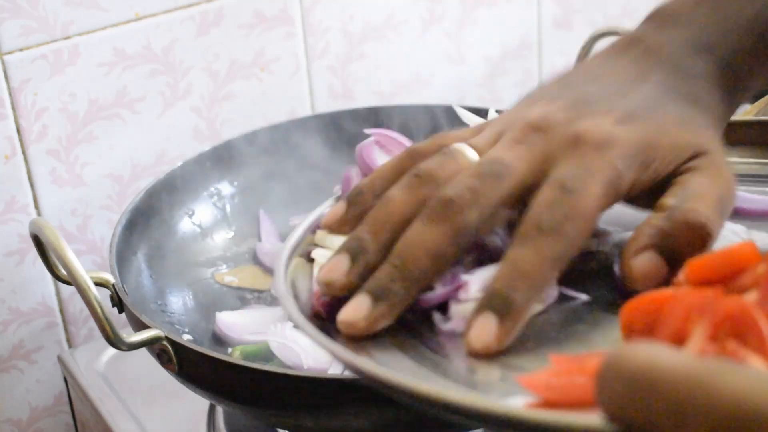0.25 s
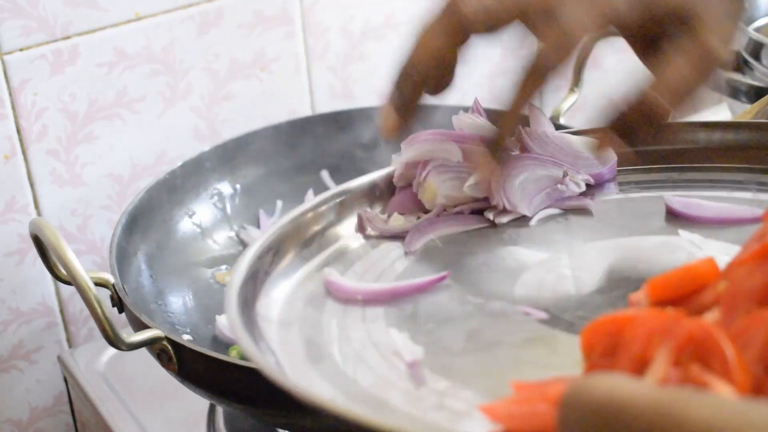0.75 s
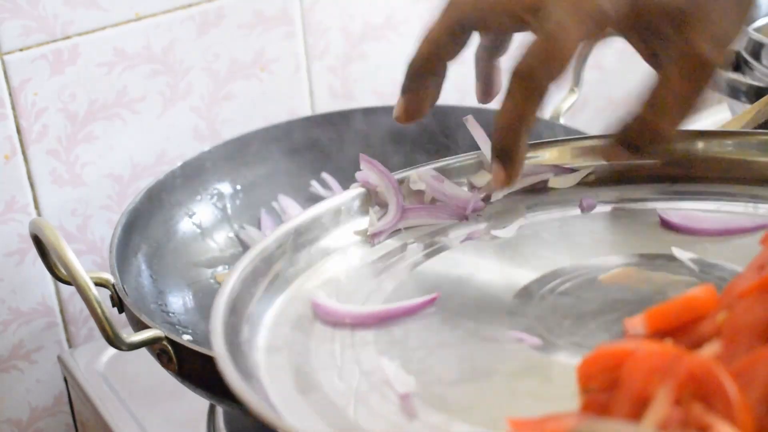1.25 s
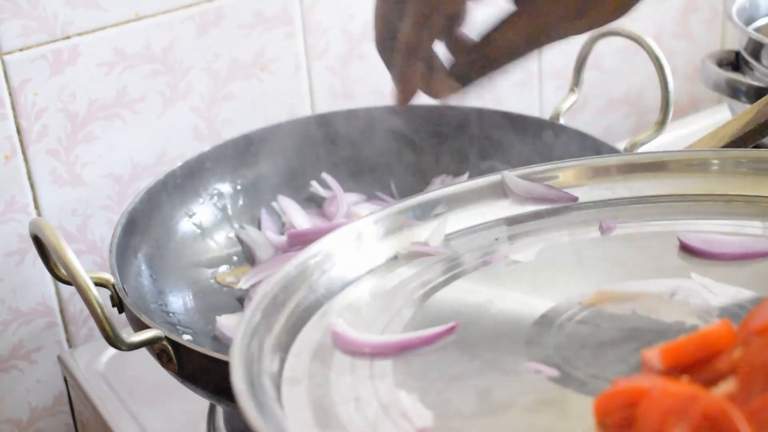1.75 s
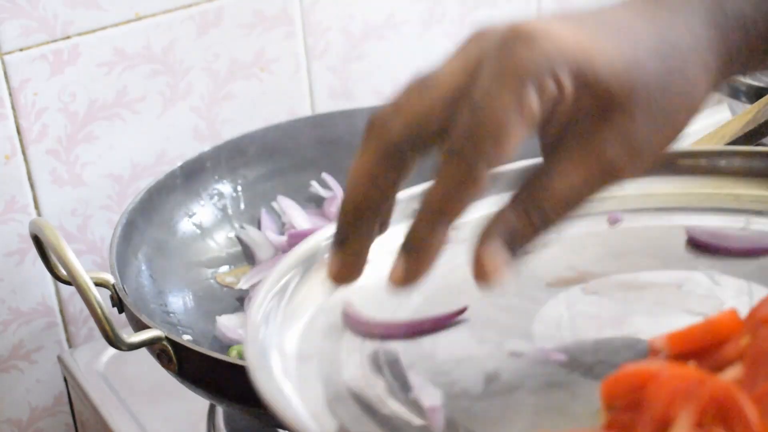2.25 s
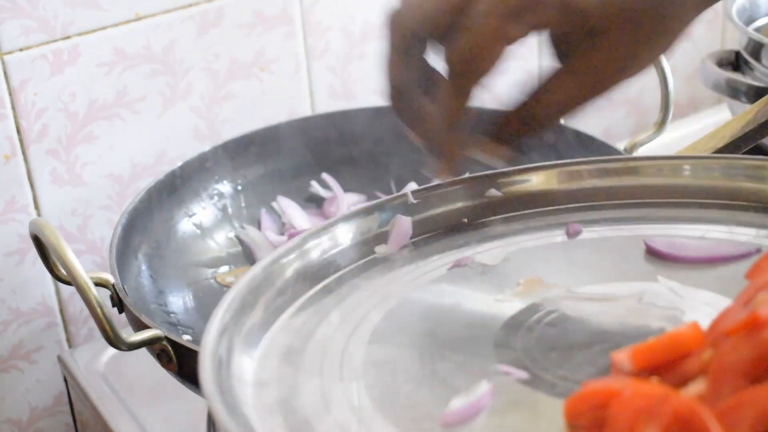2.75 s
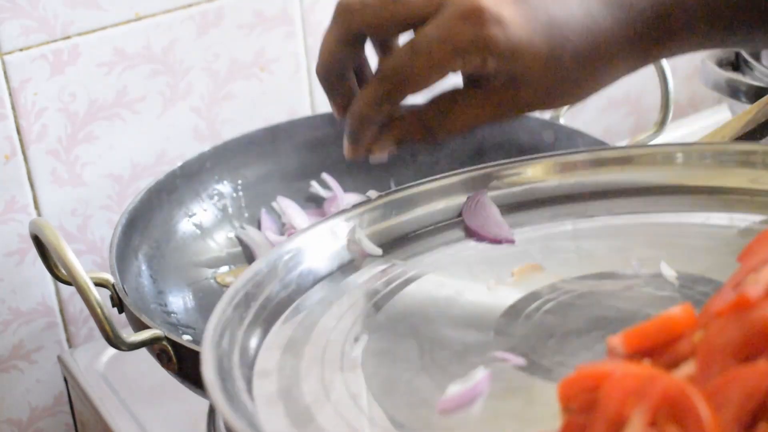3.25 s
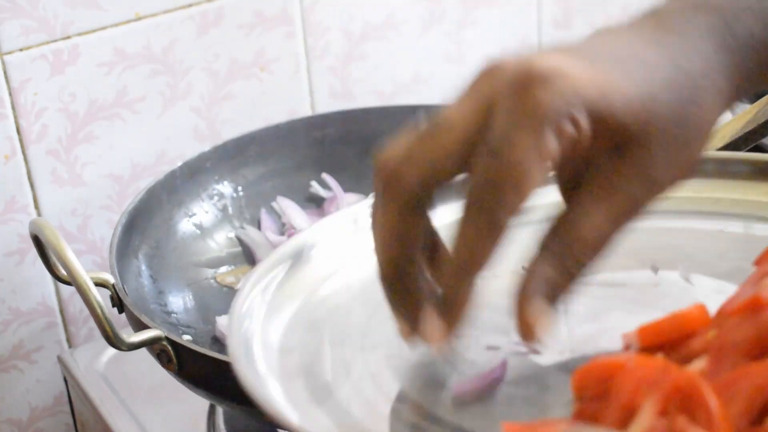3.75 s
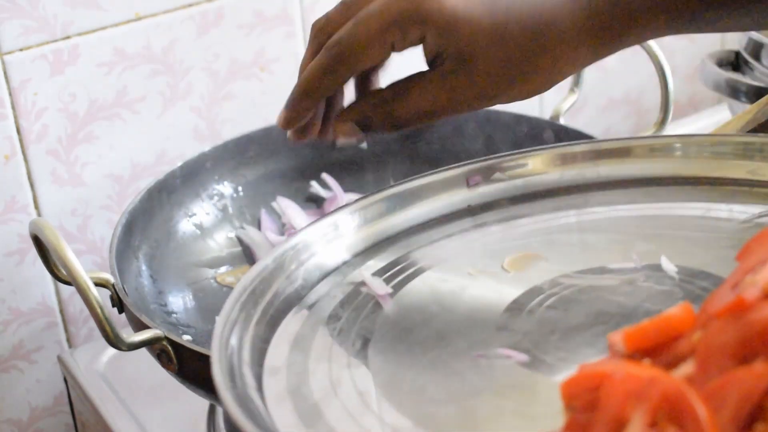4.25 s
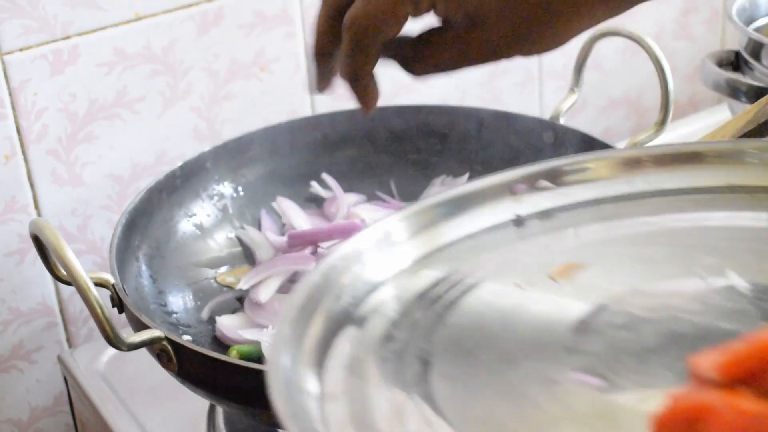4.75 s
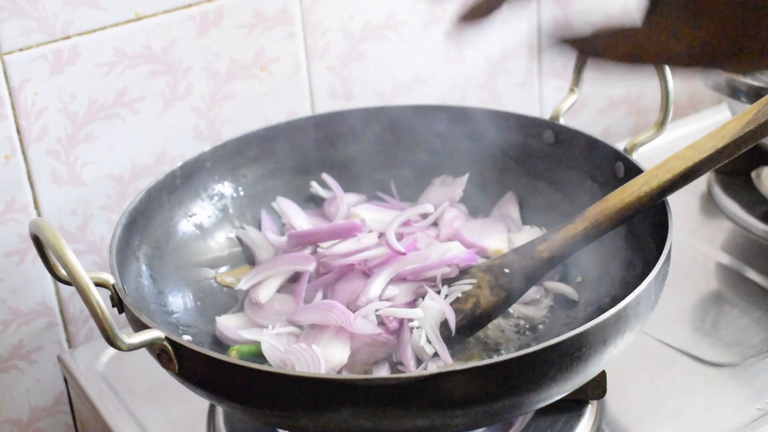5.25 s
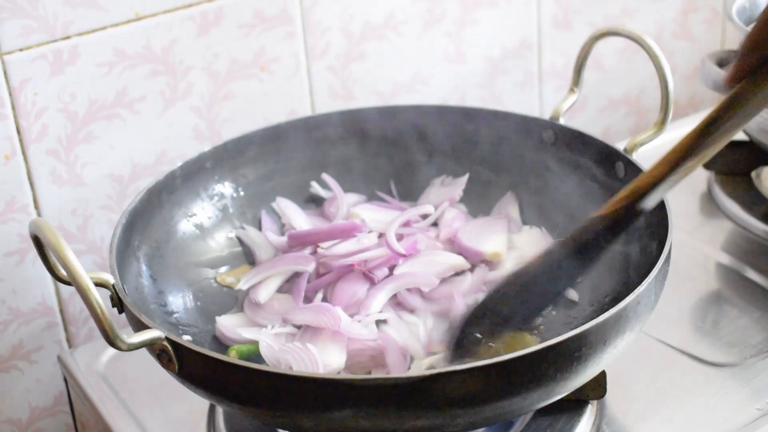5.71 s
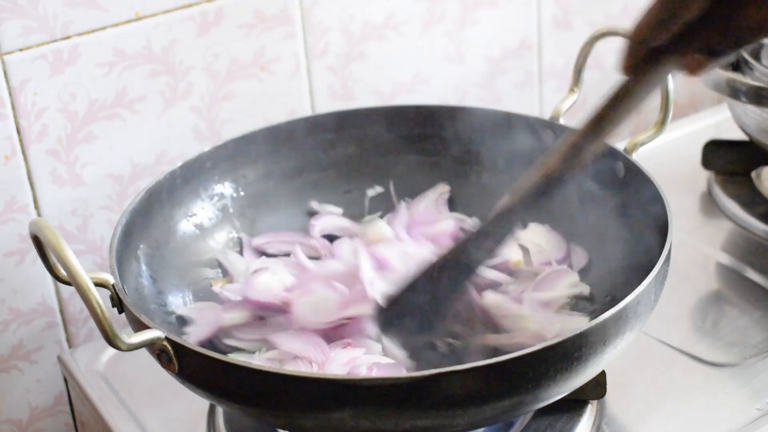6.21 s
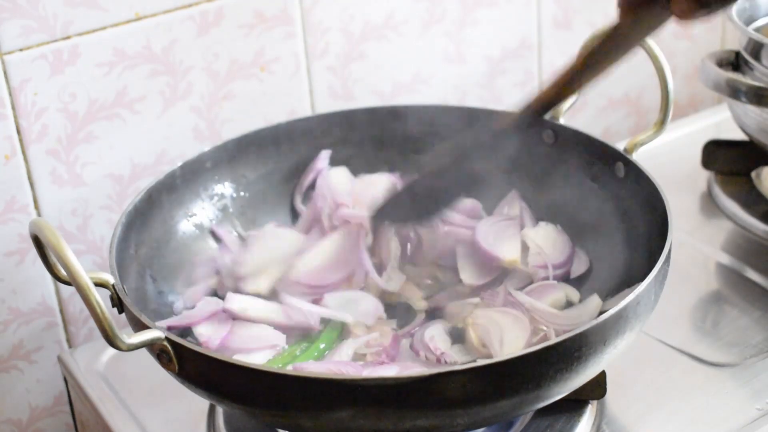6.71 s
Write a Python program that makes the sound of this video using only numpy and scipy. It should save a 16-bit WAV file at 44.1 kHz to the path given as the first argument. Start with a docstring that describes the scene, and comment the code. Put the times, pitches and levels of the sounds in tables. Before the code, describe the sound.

Loud wet frying: dense hiss and crackle with sharp oil pops, settling slowly, with two dull spatula knocks and stirring near the end.

```python
"""A bright, loud sizzle with sharp pops: sliced onions have just met the hot oil in an iron pan.
Their boiling water is made of many random bursts: coarse crackle, fine fizz and short pitched blips.
Single drops pop as short clicks with echoes; each flare of boiling swells quickly and then fades.
Later a spatula knocks dully and stirs up flurries of fine crackle.
The pan rings along, a tiled kitchen echoes and a low hum lies beneath; both channels are alike."""
import sys
import numpy as np
from scipy import signal
from scipy.fft import rfft, irfft, next_fast_len
from scipy.io import wavfile
from scipy.ndimage import map_coordinates

SR = 44100
rng = np.random.default_rng(int(sys.argv[2]) if len(sys.argv) > 2 else 0)


def wrap_up_sound(samples):
    """Save the sound to the file named by the first command line argument, as 16-bit audio."""
    columns = np.atleast_2d(samples).T
    # keep every value between -1 and 1, then stretch to whole-number steps
    tamed = np.clip(columns, -1, 1)
    steps = np.round(tamed * 32767).astype(np.int16)
    wavfile.write(sys.argv[1], SR, steps)


N = 307553


def amp(db):
    """Turn decibels into a gain."""
    return 10 ** (np.asarray(db) / 20)


def unit(x):
    """Scale a sound to an average strength (rms) of 1."""
    return x / np.sqrt(np.mean(x ** 2) + 1e-20)


def along(points, hz):
    """Read a curve of (Hz, value) points, with straight lines between them on a log pitch axis."""
    point_hz, values = np.transpose(points)
    return np.interp(np.log(hz + 1), np.log(point_hz + 1), values)


def wobble(rate):
    """Make a smooth random curve from rate random points a second."""
    points = rng.standard_normal(int(N * rate / SR) + 4)
    return map_coordinates(points, [np.arange(N) * rate / SR])


def filtered(x, response):
    """Multiply each frequency in x by the response, a function of Hz."""
    size = next_fast_len(N + SR // 2)
    hz = np.fft.rfftfreq(size, 1 / SR)
    return irfft(rfft(x, size) * response(hz), size)[:N]


def coloured(x, spectrum):
    """Shape x by a spectrum and scale it to rms 1."""
    return unit(filtered(x, lambda hz: amp(along(spectrum, hz))))


def add(track, s, sound):
    """Mix a sound into the track at time s, in seconds."""
    start = int(np.clip(s * SR, 0, N - 1))
    track[start:start + len(sound)] += sound[:N - start]


def click(hz, octaves, size=1024):
    """A click of energy 1: one hump of frequencies around hz, starting at once with nothing before it."""
    f = np.fft.rfftfreq(size, 1 / SR) + 1
    hump = (1 + (np.log2(f / hz) / octaves) ** 2 / 3) ** -4
    # folding the cepstrum (the spectrum of the log spectrum) puts the energy as early as possible
    cepstrum = irfft(np.log(hump + 1e-4))
    cepstrum[1:size // 2] *= 2
    cepstrum[size // 2 + 1:] = 0
    wave = irfft(np.exp(rfft(cepstrum)))
    return wave / np.linalg.norm(wave)


# how long the tiled kitchen takes to die away by 60 dB: (pitch_hz, fade_s)
TILE_ECHO = [(200, 0.74), (1200, 0.19), (4000, 0.28), (14000, 0.29)]


def echoes(count, burst_s=.008, early_db=0, early_s=0.056, late_db=0.0, gap_s=0.0068):
    """Paths of energy 1 from spots in the pan: the burst, quick returns from bowl and wall, the room's tail."""
    t = np.arange(SR // 4) / SR
    # the tail is noise that fades at a different speed for each frequency
    hz, frame_s, z = signal.stft(rng.standard_normal((count, len(t))), SR, nperseg=256)
    fade = amp(-60 * frame_s / along(TILE_ECHO, hz)[:, None])
    late = signal.istft(z * fade, SR, nperseg=256)[1][:, :len(t)]
    # cubing the noise leaves few, strong returns
    early = rng.standard_normal(late.shape) ** 3 * amp(-60 * t / early_s)
    burst = rng.standard_normal(late.shape) * amp(-60 * t / burst_s)
    arrival = 1 - np.exp(-t / gap_s)  # echoes build up after the burst
    parts = (burst, 0), (early * arrival, early_db), (late * arrival, late_db)
    paths = sum(amp(db) * part / np.linalg.norm(part, axis=1, keepdims=True) for part, db in parts)
    return paths / np.linalg.norm(paths, axis=1, keepdims=True)


def bubbles(rate, low_hz, high_hz, octaves, spread_db, rarest, burst_s, count=32):
    """About rate random bursts a second from count spots in the pan, each with its own pitch and echoes."""
    track = np.zeros(N)
    paths = echoes(count, burst_s=burst_s, early_db=1, early_s=0.084, late_db=-1.5)
    for hz, path in zip(np.geomspace(low_hz, high_hz, count), paths):
        bursts = max(1, int(rate * N / SR / count))
        where, strength, sign = rng.random((bursts, 3)).T
        # weak bursts are common, strong ones rare; rarest limits the strongest
        sizes = amp(-spread_db * np.log(strength + rarest)) * np.sign(sign - .5)
        train = np.bincount((where * N).astype(int), sizes, N)
        sound = np.convolve(path, click(hz, octaves))
        track += np.sqrt(hz) * signal.oaconvolve(train, sound)[:N]
    return unit(track)


# every flare swells quickly, then falls by the same amount over its length, ever faster
FLARE_RISE_S, FLARE_FADE_DB, FLARE_FADE_POWER = 0.12, 10, 1.6


def flare(s, length):
    """Boiling after wet onion lands at s: a quick swell, then a fade as its surface water is used up."""
    age = np.maximum(np.arange(N) / SR - s, 0)
    swell = np.sqrt(np.minimum(age / FLARE_RISE_S, 1))
    return swell * amp(-FLARE_FADE_DB * (age / length) ** FLARE_FADE_POWER)


# wet onion meets the oil, dropped in or turned over, and the boiling flares up:
# (start_s, length_s, bubbling_db, fizz_db, bright_db), bright_db being the finest spray relative to the fizz
ONION_FLARES = [(-0.12, 1.56, -28.5, -23.5, 0), (0.47, 0.35, -29, -44, -1), (1.26, 0.35, -34, -29.5, 3.5),
                (2.28, 1.3, -32.6, -31.7, -15), (3.55, 1.3, -31.3, -38, 2), (4.4, 0.28, -37, -26, -0.5),
                (4.889, 0.6, -34.5, -29.5, -2), (5.59, 0.22, -34.5, -31, -8), (5.9, 2.4, -38.5, -60, -10)]
# the steady simmer under the flares
SIMMER_BUBBLING_DB, SIMMER_FIZZ_DB = -34, -35
# fresh onion throws mostly small bubbles: the deepest bubbling swells less in a flare
DEEP_FLARE_DB = -4


def boil():
    """Gains of deepest bubbling, bubbling, fizz and finest spray: simmer and flares add in power."""
    deep = bubbling = amp(SIMMER_BUBBLING_DB) ** 2
    fizz = finest = amp(SIMMER_FIZZ_DB) ** 2
    for s, length, bubbling_db, fizz_db, bright_db in ONION_FLARES:
        steam = flare(s, length)
        deep = deep + (amp(bubbling_db + DEEP_FLARE_DB) * steam) ** 2
        bubbling = bubbling + (amp(bubbling_db) * steam) ** 2
        fizz = fizz + (amp(fizz_db) * steam) ** 2
        finest = finest + (amp(fizz_db + bright_db) * steam) ** 2
    return np.sqrt([deep, bubbling, fizz, finest])


# tone colour of the coarse bubbling, relative levels: (pitch_hz, level_db per Hz)
BUBBLING_COLOUR = [(60, -40), (170, -24), (350, -13), (600, -11), (1000, -4), (1800, 0), (3200, -1.5),
                   (5000, -8), (9000, -17), (16000, -26)]
# tone colour of the fine fizz, also used by the stirring, relative levels: (pitch_hz, level_db per Hz)
FIZZ_COLOUR = [(300, -49), (1500, -22), (3500, -0.5), (5500, 1), (8000, -0.5), (10000, -1), (12000, -6),
               (14000, -7), (15800, -14.5)]
# the deepest bubbling lies below the first pitch, the finest spray above the second
DEEP_HZ, FINEST_HZ = 1380, 9500


def sizzle(deep_gain, bubbling_gain, fizz_gain, finest_gain):
    """Steam escapes through the oil: crackle and fizz, each over a wash of bursts too small to tell apart."""
    crackle = bubbles(rate=380, low_hz=687, high_hz=7350, octaves=0.87,
                      spread_db=7, rarest=0.09, burst_s=0.0075)
    spray = bubbles(rate=600, low_hz=2770, high_hz=14500, octaves=0.88,
                    spread_db=11, rarest=0.053, burst_s=0.01)
    # bubbles that stay whole for a few cycles sound with a pitch
    blips = bubbles(rate=80, low_hz=1405, high_hz=10040, octaves=0.067,
                    spread_db=8.0, rarest=0.14, burst_s=0.02)

    coarse = amp(-3.5) * coloured(crackle, BUBBLING_COLOUR)
    coarse = coarse + amp(-3) * coloured(rng.standard_normal(N), BUBBLING_COLOUR)
    fine = amp(-3.5) * coloured(spray, FIZZ_COLOUR)
    fine = fine + amp(-5) * coloured(rng.standard_normal(N), FIZZ_COLOUR)
    fine = fine + amp(-12.5) * coloured(blips, FIZZ_COLOUR)

    deep = filtered(coarse, lambda hz: 1 / (1 + (hz / DEEP_HZ) ** 6))
    coarse = bubbling_gain * (coarse - deep) + deep_gain * deep
    # fresh wet onion throws the finest spray
    finest = filtered(fine, lambda hz: 1 / (1 + (FINEST_HZ / (hz + 1)) ** 6))
    fine = fizz_gain * (fine - finest) + finest_gain * finest

    surge_db = 0.72 * wobble(12)
    flicker_db = 0.34 * wobble(25)  # the fizz flickers a little on its own
    return amp(surge_db) * (coarse + fine * amp(flicker_db))


# smaller drops spit at random, more often and louder the harder the oil bubbles
SPIT_COUNT = 28
# typical pitch and width; each drop varies around them
SPIT_HZ, SPIT_PITCH_SPREAD_OCTAVES, SPIT_WIDTH_OCTAVES = 4280, 0.82, 1.0
SPIT_OVER_BUBBLING_DB, SPIT_SPREAD_DB, SPIT_BURST_S = -1, 1.0, 0.0086


def spits(bubbling_gain):
    """Small pops, one per equal share of the water boiled off, as rows laid out like the loudest pops."""
    boiled = np.cumsum(bubbling_gain ** 2)
    shares = (np.arange(SPIT_COUNT) + rng.random(SPIT_COUNT)) / SPIT_COUNT
    at = np.searchsorted(boiled / boiled[-1], shares)
    size, pitch, width = rng.standard_normal((SPIT_COUNT, 3)).T
    db = 20 * np.log10(bubbling_gain[at]) + SPIT_OVER_BUBBLING_DB + SPIT_SPREAD_DB * size
    hz = SPIT_HZ * 2 ** (SPIT_PITCH_SPREAD_OCTAVES * pitch)
    octaves = SPIT_WIDTH_OCTAVES * 2 ** width
    return np.column_stack([at / SR, db, hz, octaves, np.full(SPIT_COUNT, SPIT_BURST_S)])


def blows(rows, gain_db, paths):
    """One click with its own echoes for each row; gain_db raises the level of them all."""
    track = np.zeros(N)
    for (s, db, hz, octaves), path in zip(rows, paths):
        sound = signal.fftconvolve(path, click(hz, octaves))
        add(track, s, amp(db + gain_db) * sound / np.linalg.norm(sound))
    return track


# the loudest pops, as drops burst and wet slices hit the oil, levels before the gain all pops share:
# (start_s, level_db, pitch_hz, width_octaves, burst_s)
LOUD_POPS = [(0.0098, -18, 3970, 2.6, .007), (0.0229, -26, 6540, 1.8, .03),
             (0.0936, -23, 2290, 0.71, 0.0072), (0.3859, -19.5, 2940, 1.8, 0.012),
             (0.5771, -25, 2730, 0.73, .025), (0.6087, -19.5, 2900, 2.05, 0.026),
             (0.6654, -29.5, 1220, 0.27, 0.014), (0.7646, -27, 2130, 2.3, .006),
             (0.7857, -28, 3170, 0.17, .025), (0.8234, -28, 6080, 1.1, .02), (0.912, -32, 3060, 0.32, .03),
             (1.0242, -30.5, 1340, 1.03, 0.028), (1.4129, -19, 3520, 0.95, .006),
             (1.4734, -21.2, 3100, 0.6, .05), (1.5656, -19.5, 2590, 2.4, 0.011),
             (1.9459, -26.5, 3650, 0.35, .009), (1.9475, -27.5, 9000, 1.8, 0.012),
             (1.9882, -34.5, 1000, 2, 0.036), (2.4472, -25.5, 2980, 0.19, .007),
             (2.4611, -29, 2250, 0.89, .04), (2.5988, -27.5, 5400, 0.4, .008),
             (2.646, -24.5, 2500, 0.7, 0.012), (2.7724, -25.5, 5600, 1.1, 0.01),
             (3.068, -25.5, 2210, 1.4, 0.01), (3.183, -34.5, 2800, 0.3, .03),
             (3.2966, -30, 1530, 0.91, 0.055), (3.4225, -22, 2200, 1.28, 0.089),
             (3.5012, -28.5, 1900, 0.86, .02), (3.5918, -25.5, 2360, 0.6, 0.0076),
             (3.6775, -19, 4800, 2.2, 0.029), (3.844, -27.5, 1670, 0.95, .014),
             (4.1225, -31, 2300, 0.75, .015), (4.2605, -26.5, 1790, 0.85, .01),
             (4.351, -28.5, 2080, 1.54, .008), (4.5435, -22.5, 2120, 1.94, 0.0063),
             (4.8052, -29, 2280, 0.97, 0.0067), (4.9819, -26.5, 3160, 1.9, .009),
             (5.3428, -31, 2470, 0.41, .012), (5.6562, -27.5, 1520, 0.97, 0.007),
             (5.9724, -26.5, 3200, 0.86, 0.0087), (6.2075, -24, 2300, 0.54, .006),
             (6.2389, -26, 2400, 1.5, 0.032), (6.3231, -27, 1750, 1, .009), (6.6403, -33, 2600, 0.8, .012)]


def popping(bubbling_gain):
    """Drops burst, large and small: a short burst is a crack, a long one a wet spatter."""
    drops = np.vstack([LOUD_POPS, spits(bubbling_gain)])
    paths = echoes(len(drops), burst_s=drops[:, -1:], early_db=-2.0, early_s=0.08, late_db=1.0)
    pops = blows(drops[:, :-1], gain_db=30.5, paths=paths)
    # bursting drops radiate little bass and little at the very top
    band = signal.butter(3, [550, 15000], "bandpass", fs=SR, output="sos")
    return signal.sosfilt(band, pops)


# ringing tones of the pan, levels relative to the sound that excites them: (pitch_hz, width_hz, level_db)
PAN_TONES = [(293, 13.4, 1), (562, 6.4, -2), (604.7, 7.1, 6), (794, 55, -4), (1132, 20.5, 5), (1175, 10, 4),
             (1264, 6.5, 4), (1569, 13, 0.5), (1682, 36, -1), (1820, 60, -7), (2560, 77, -5.5),
             (3064, 30, -6), (3430, 37, -10), (4770, 49, -14), (6980, 35, -24), (9050, 50, -8)]


def pan_ring(hz):
    """The iron bowl lifts the sound at its modes, the pitches where it likes to ring."""
    lift = 1
    for centre, width, db in PAN_TONES:
        lift = lift + amp(db) * 1j * hz * width / (centre ** 2 - hz ** 2 + 1j * hz * width)
    return lift


# tone colour of the kitchen hum, relative levels: (pitch_hz, level_db per Hz)
HUM_COLOUR = [(20, -21), (45, -25), (70, -23), (87, 4.5), (102, -8), (150, -3), (180, 9.5), (220, 4),
              (400, -2), (1500, -32)]


def kitchen_hum():
    """A quiet low hum: steady noise shaped to the kitchen's tone colour."""
    return amp(-68) * coloured(rng.standard_normal(N), HUM_COLOUR)


# dull knocks of the spatula on the pan, levels before the gain they share:
# (start_s, level_db, pitch_hz, width_octaves)
SPATULA_KNOCKS = [(5.580, -42, 420, 1.15), (6.484, -43.5, 480, 1.25)]


def knocking():
    """The wooden spatula hits the pan: low clicks with weak echoes."""
    paths = echoes(len(SPATULA_KNOCKS), burst_s=.025, early_db=-5, early_s=.04, late_db=-6)
    return blows(SPATULA_KNOCKS, gain_db=31, paths=paths)


# the spatula scrapes through the onions and turns wet faces onto the iron: (start_s, length_s, level_db)
SPATULA_STROKES = [(5.623, 0.3, -34), (6.215, 0.25, -32), (6.56, 0.13, -53)]


def stirring():
    """Each stroke raises a flurry of fine crackle that swells quickly and dies away."""
    strength = np.zeros(N)
    for s, length, db in SPATULA_STROKES:
        progress = np.linspace(0, 1, max(2, int(length * SR)))
        # the square root moves the peak to a quarter of the stroke
        add(strength, s, amp(db) * np.abs(np.sin(np.pi * np.sqrt(progress))))
    flurry = bubbles(rate=1400, low_hz=2520, high_hz=12100, octaves=0.58,
                     spread_db=9, rarest=0.05, burst_s=0.0056, count=8)
    return strength * coloured(flurry, FIZZ_COLOUR)


def scene():
    """Everything in the pan rings through it, over the low hum of the kitchen; both channels are alike."""
    deep_gain, bubbling_gain, fizz_gain, finest_gain = boil()
    frying = sizzle(deep_gain, bubbling_gain, fizz_gain, finest_gain) + popping(bubbling_gain)
    in_pan = frying + knocking() + stirring()
    mono = filtered(in_pan, pan_ring) + kitchen_hum()
    return np.array([mono, mono])


TOP_HZ = 15800


def record(dry):
    """The recorder keeps nothing from its band limit upwards."""
    return np.array([filtered(channel, lambda hz: hz < TOP_HZ) for channel in dry])


dry = scene()
out = record(dry)
wrap_up_sound(out)
```